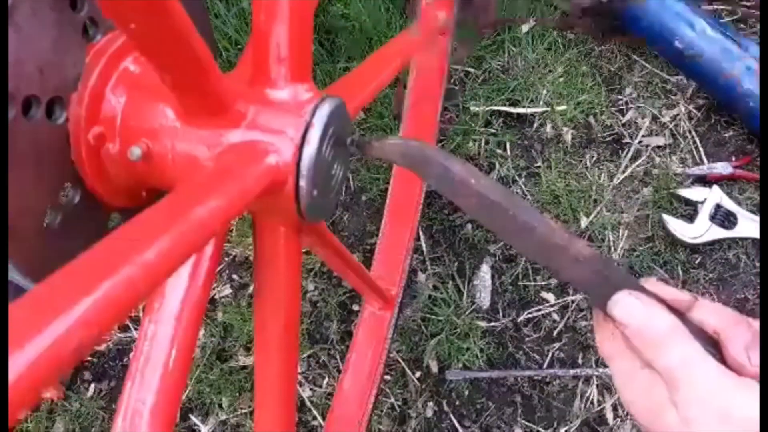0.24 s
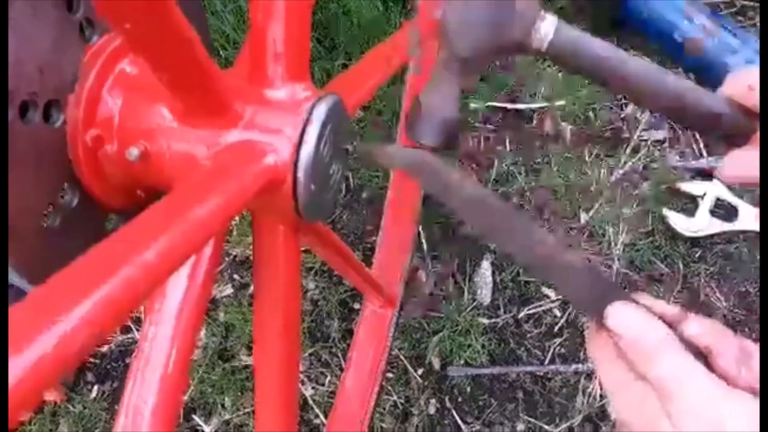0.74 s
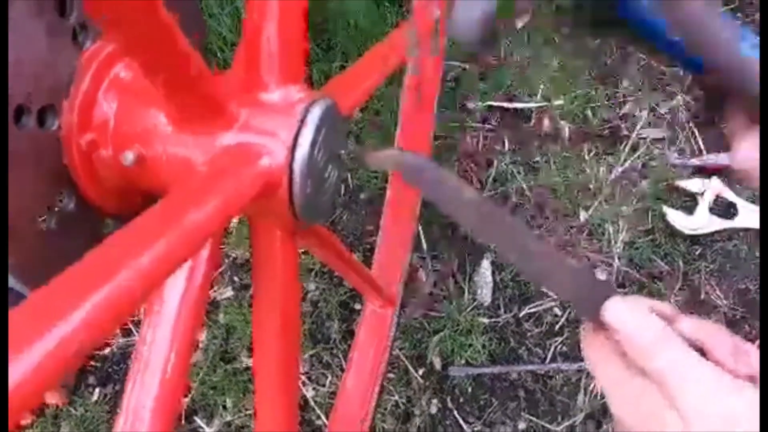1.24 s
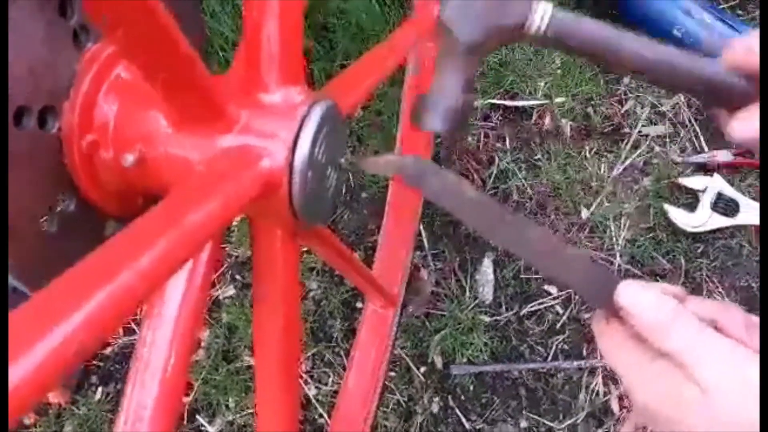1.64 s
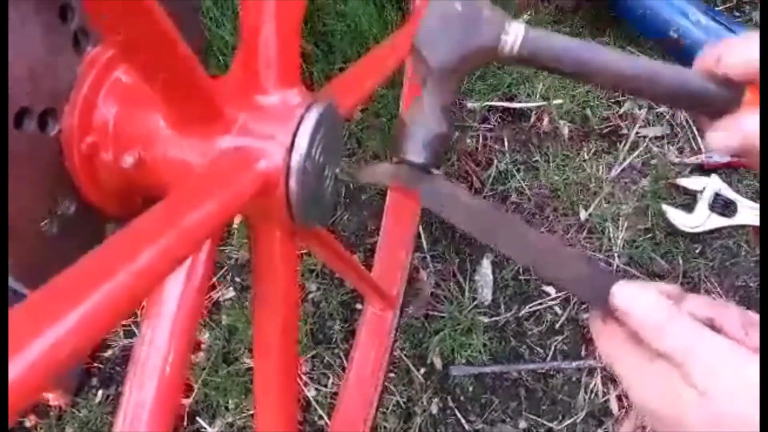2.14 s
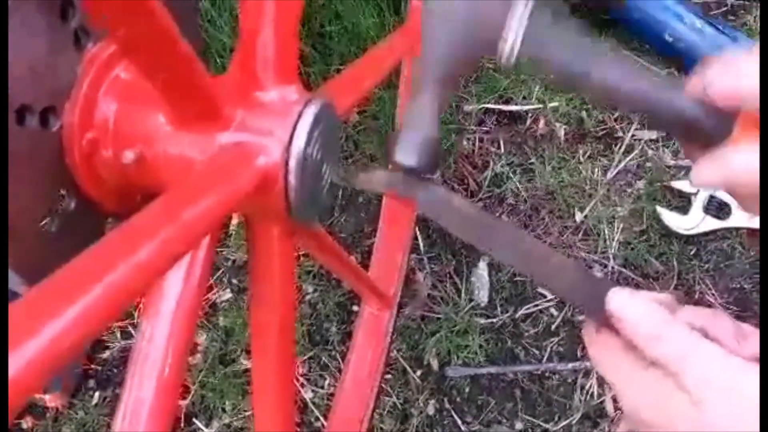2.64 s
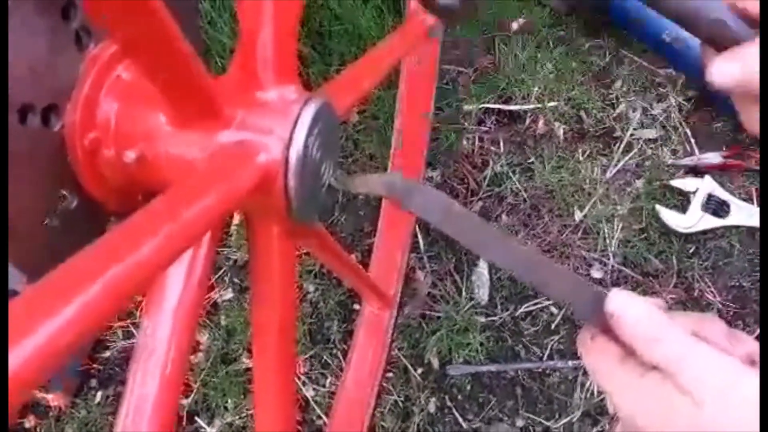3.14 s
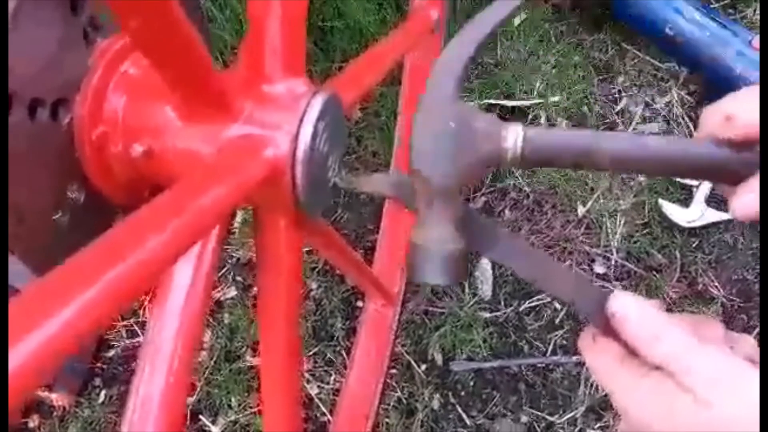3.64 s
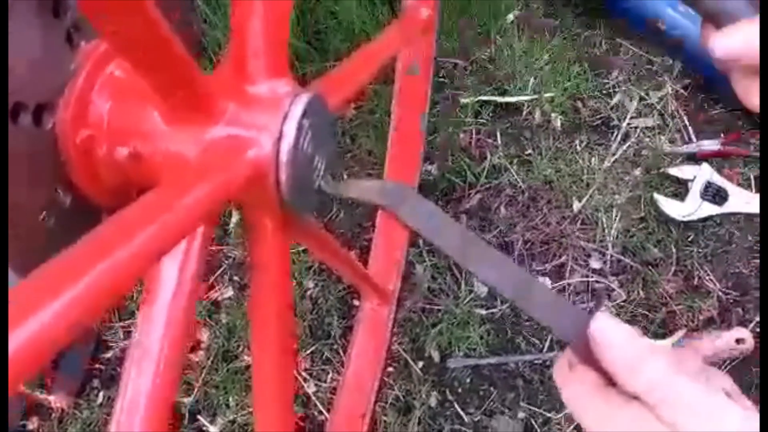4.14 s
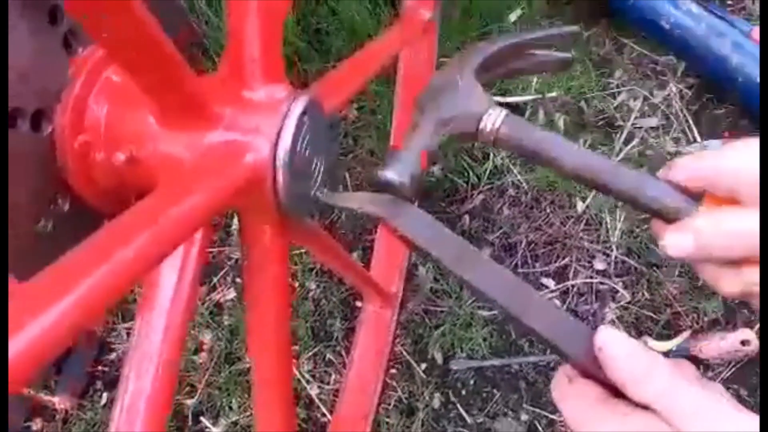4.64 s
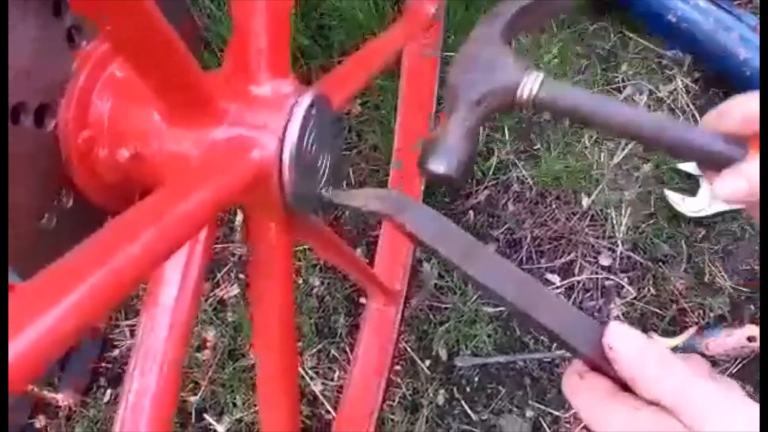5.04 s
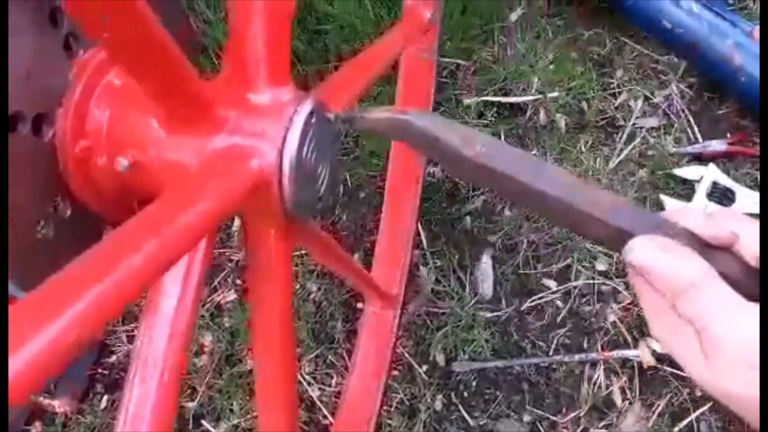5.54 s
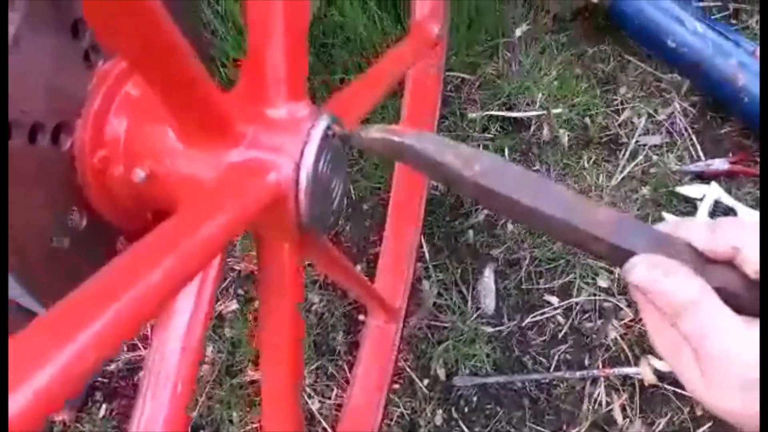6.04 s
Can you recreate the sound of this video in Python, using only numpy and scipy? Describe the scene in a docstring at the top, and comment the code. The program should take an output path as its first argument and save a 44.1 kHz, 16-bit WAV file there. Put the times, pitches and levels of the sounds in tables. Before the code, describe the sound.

A hammer repeatedly strikes a steel punch against a metal wheel cap, making short, sharp clangs, with wind gusts on the microphone.

```python
"""Outdoors in a yard, a hammer strikes a hand-held steel punch set on the hub cap of an iron wheel.
Each blow makes a short, dense clang as the metal rings, and a low thud through the ground.
Between blows the punch tip ticks and clinks on the cap. Gusts of wind buffet the left and right
microphone openings, over a faint hiss of far leaves and traffic."""
import sys
import numpy as np
from scipy import signal
from scipy.fft import rfft, irfft, next_fast_len
from scipy.io import wavfile
from scipy.ndimage import map_coordinates

SR = 44100
rng = np.random.default_rng(int(sys.argv[2]) if len(sys.argv) > 2 else 0)


def output_pcm(signal):
    """Save a mono or channel-first signal as 16-bit PCM at the path in sys.argv[1].

    Samples are clipped to [-1, 1] before scaling.
    """
    pcm = np.clip(np.atleast_2d(signal).T, -1, 1) * 32767
    wavfile.write(sys.argv[1], SR, np.round(pcm).astype(np.int16))


N = 276948

# the tones of the steel punch as it bends: (pitch [Hz], level [dB], base ring time [s])
PUNCH_TONES = [(2200, -5, 0.058), (4103, -2.5, 0.017), (4616, -5, 0.067), (6420, -9, 0.051),
               (8300, -15.5, 0.08), (9680, -6.5, 0.025), (11500, 5, 0.048)]


def amp(db):
    """Turn decibels into a factor to multiply by."""
    return 10 ** (np.asarray(db) / 20)


def unit(x):
    """Scale a sound to an average power of 1."""
    return x / np.sqrt(np.mean(x ** 2) + 1e-20)


def fade(t, ring_time):
    """A fade that falls by 60 dB in ring_time seconds."""
    return amp(-60 * t / ring_time)


def along(points, hz):
    """Read between (frequency, value) points, giving each octave equal room."""
    freqs, values = np.transpose(points)
    return np.interp(np.log(hz + 1), np.log(freqs + 1), values)


def wobble(rate, size):
    """A smooth random curve with a new value every 1 / rate steps."""
    return map_coordinates(rng.standard_normal(int(size * rate) + 4), [np.arange(size) * rate])


def filtered(x, gain):
    """Multiply each frequency in a sound by gain(hz)."""
    size = next_fast_len(x.shape[-1] + 8192)
    return irfft(rfft(x, size) * gain(np.fft.rfftfreq(size, 1 / SR)), size)[..., :x.shape[-1]]


def coloured(x, colour):
    """Shape a sound's bass and treble with (frequency [Hz], level [dB]) points."""
    return filtered(x, lambda hz: amp(along(colour, hz)))


def dying_noise(ring_times, stretch, size, channels):
    """Noise in which each frequency dies at its own speed; stretch multiplies the ring times."""
    hz, t, spectrum = signal.stft(rng.standard_normal((channels, size)), SR, nperseg=128)
    life = np.clip(stretch * along(ring_times, hz), .005, 3)[:, None]
    return signal.istft(spectrum * fade(t, life), SR, nperseg=128)[1][:, :size]


def ringing(tones, stretch, t, scatter_db):
    """Fading tones of struck metal; each stands for a cluster of close tones, so it wavers."""
    hz, db, ring_time = np.transpose(tones)[:, :, None]
    level_luck, phase_luck = rng.standard_normal((2, len(tones), 1))
    wander = 1.2 * np.array([wobble(4.7 / (life * SR), len(t)) for life in ring_time[:, 0]])
    waves = np.sin(2 * np.pi * hz * t + 3 * phase_luck + wander)
    return np.sum(amp(db + scatter_db * level_luck) * fade(t, stretch * ring_time) * waves, axis=0)


def place(out, sound, start, spread):
    """Add a sound with random phase shifts on each side, so it sounds wide and slightly smeared."""
    lead = 1024  # samples of room, as shifting phases smears the sound earlier too
    sound = np.pad(sound, ((0, 0), (lead, 0)))
    size = sound.shape[1]
    bins = size // 2 + 1
    phase = spread * np.array([wobble(45 / bins, bins), wobble(45 / bins, bins)])
    pair = irfft(rfft(sound) * np.exp(1j * phase), size)
    at = round(start * SR) - lead
    out[:, at:at + size] += pair[:, :N - at]


def hiss():
    """Far leaves and traffic, alike on the left and right only in the bass."""
    # colour of the hiss: (frequency [Hz], level [dB])
    colour = [(24, -51.5), (40, -5), (115, 1.5), (146, -2.5), (535, -9), (1460, -14), (2560, -11),
              (3190, -15), (3430, -15.5), (4170, -13), (8900, -25.5), (11900, -20), (13800, -35.5)]
    # how alike the two sides are: (frequency [Hz], likeness [0 to 1])
    likeness = [(60, .5), (200, 0.22), (700, 0.13), (13000, 0.024)]

    def split(hz):
        angle = np.arccos(along(likeness, hz)) / 2
        return amp(along(colour, hz)) * [np.cos(angle), np.sin(angle)]

    mid, side = filtered(rng.standard_normal((2, N)), split)
    level_db = -59.5 + wobble(4 / SR, N)
    return amp(level_db) * unit(np.array([mid + side, mid - side]))


def wind():
    """Swirls of air hit each microphone opening in lumps; the sharpest ones flutter higher up."""
    # strength of the wind: (time [s], level [dB])
    gusts = [(0.1, -57.5), (0.24, -28), (0.31, -28), (0.349, -44.5), (0.41, -34.5), (0.48, -38.5),
             (0.6, -49.5), (0.74, -67), (1.9, -75), (2.02, -50), (2.1, -64), (2.2, -33), (2.33, -25.5),
             (2.461, -43), (2.681, -45), (2.8, -51.5), (2.92, -77.5), (4.199, -81), (4.31, -37.5),
             (4.45, -56), (4.601, -76.5), (4.879, -67.5), (4.93, -45), (4.99, -61.5), (5.16, -25),
             (5.28, -28), (5.45, -33.5), (5.6, -49), (5.69, -45.5), (5.738, -40), (5.93, -33.5),
             (6.05, -27.5), (6.16, -18.5), (6.28, -30)]
    # colour of the low rumble: (frequency [Hz], level [dB])
    rumble_colour = [(12, -51.5), (20, -24), (56, -0.5), (143, -0.5), (306, -5), (526, -18), (576, -16),
                     (1500, -48), (1950, -73.5), (3300, -120)]
    # colour of the flutter: (frequency [Hz], level [dB])
    flutter_colour = [(59, -44.5), (100, -11), (151, -17), (304, -11), (422, 2), (474, -3), (1370, -24),
                      (5000, -68), (6500, -101), (11000, -120)]
    brisk_db, flutter_growth = -30, 1.3  # the flutter swells faster than the wind
    wind_db = np.interp(np.arange(N) / SR, *np.transpose(gusts))
    flutter_db = brisk_db - 4.5 + flutter_growth * (wind_db - brisk_db)
    swirls_db = 2.2 * (wobble(32 / SR, N) + np.array([wobble(40 / SR, N), wobble(40 / SR, N)]))
    spikes_db = 4 * np.array([wobble(140 / SR, N), wobble(140 / SR, N)])
    noise = rng.standard_normal((2, 2, N))
    rumble = unit(coloured(noise[0] * amp(swirls_db), rumble_colour))
    flutter = unit(coloured(noise[1] * amp(1.3 * swirls_db + spikes_db), flutter_colour))
    return amp(wind_db) * rumble + amp(flutter_db) * flutter


def puffs():
    """A strong swirl is two or three swings of air pressure, out of step on the two sides."""
    # the strongest swirls: (time [s], peak level [dB], pitch [Hz], left over right [dB])
    swirls = [(0.194, -22.5, 80, 0), (0.228, -21.5, 90, -3), (0.294, -17, 83.4, -3.5),
              (0.384, -21.5, 265, -3), (2.232, -19, 179, 2), (2.259, -14, 204, -3), (2.284, -18, 504, 3.5),
              (2.317, -18.5, 86.1, -2), (2.348, -19.5, 355, -6), (5.16, -14.5, 330, 2.5),
              (5.28, -13, 346, -3), (5.458, -19.5, 310, 4), (5.725, -26.5, 130, 4), (6.043, -15, 357, -4),
              (6.053, -7, 254, 1), (6.111, -5, 302, 2.5), (6.142, -4.5, 420, -5.5), (6.154, -5, 439, 18.5),
              (6.168, -25, 247, -2), (6.191, -9.5, 406, -0.5), (6.267, -13, 333, 2)]
    out, t = np.zeros((2, N + SR)), np.arange(SR // 20) / SR
    for start, db, hz, pan_db in swirls:
        age = t * hz / 0.8  # reaches 1 at the peak
        swell = (age * np.exp(1 - age)) ** 2
        swing = np.sin(2 * np.pi * hz * t + rng.uniform(0, 2 * np.pi, (2, 1)))
        sides = amp([[db + pan_db / 2], [db - pan_db / 2]])
        at = round(start * SR)
        out[:, at:at + len(t)] += sides * swell * swing
    return out[:, :N]


def yard_echo(x):
    """The ground and things nearby send back a blurred echo."""
    # how long the echo lasts: (frequency [Hz], base ring time [s])
    ring_times = [(300, 0.99), (1500, .4), (5000, 0.2), (12000, 0.067)]
    tail = dying_noise(ring_times, stretch=0.85, size=SR // 2, channels=2)
    return signal.fftconvolve(x, tail / np.linalg.norm(tail[0]), axes=1)[:, :N]


def punch_ticks():
    """The tip scrapes or bounces on the cap: a small scratch, and a ring cut short by the hand."""
    # light touches: (time [s], level [dB], body boost [dB], treble boost [dB])
    touches = [(0.1363, -15, -7, -13.5), (0.1517, -21, 4, -23.5), (0.3186, -42.5, 7, -28.5),
               (0.3646, -25.5, -3.5, -21), (0.6412, -42.5, 9.5, -19), (0.7848, -20.5, -11.5, -15.5),
               (1.3323, -25, -1.5, -17), (2.6657, -47.5, 6, 4.5), (3.2256, -26.5, 5.5, -9),
               (3.744, -38, -7, -18.5), (3.8385, -29, 3, -13.5), (4.1139, -32.5, 0, -14.5),
               (4.1294, -37, -4, -9), (4.1622, -43.5, -16, -15), (4.2505, -29, -6.5, -12.5),
               (4.2807, -48, 2, -6), (4.5156, -39, 8, -11.5), (4.6299, -38.5, -0.5, -7.5),
               (4.935, -47.5, 9, -19.5), (4.9551, -42.5, -3, -4.5), (5.033, -47, 7.5, -16.5),
               (5.1224, -42.5, 10.5, -24), (5.5079, -47, 9, -18), (5.7136, -36, 6.5, -14.5),
               (5.8145, -41.5, -3, -22.5), (5.8324, -43.5, 10, 1), (5.8499, -25, 0, -7.5),
               (5.9733, -41.5, -3, -7.5)]
    out, t = np.zeros((2, N)), np.arange(SR // 4) / SR
    for start, db, body_db, treble_db in touches:
        colour = [(300, body_db - 10.5), (1800, body_db), (3000, 0), (7000, 0), (9000, treble_db)]
        scratch = rng.standard_normal(len(t)) * fade(t, 0.053)
        ring = amp(-8) * ringing(PUNCH_TONES, 0.5, t, scatter_db=5)
        place(out, amp(db) * coloured(scratch + ring, colour)[None], start, spread=2.2)
    return out


def punch_clinks():
    """The loosely held punch knocks the cap and rings freely."""
    # loose knocks: (time [s], level [dB])
    knocks = [(5.3318, -35), (5.672, -33)]
    # colour of a clink: (frequency [Hz], level [dB])
    colour = [(600, -6.5), (2200, 5), (4400, 0.5), (8500, -7.5), (9300, -22.5)]
    out, t = np.zeros((2, N)), np.arange(SR // 4) / SR
    for start, db in knocks:
        ring = ringing(PUNCH_TONES, 1.0, t, scatter_db=4.5)
        scratch = 0.73 * rng.standard_normal(len(t)) * fade(t, 0.04)
        place(out, amp(db) * coloured(ring + scratch, colour)[None], start, spread=2.2)
    return out


def ground_thud(t):
    """A blow thumps through the ground; its pitch sags as it spreads."""
    cycles = 60 * t + 1.1 * (1 - np.exp(-t / 0.0039))
    return np.sin(2 * np.pi * cycles) * fade(t, 0.11)


def hub_knock(t):
    """The hub takes the blow with a very short, dull knock."""
    burst = rng.standard_normal(len(t)) * fade(t, 0.0043)
    return unit(filtered(burst, lambda hz: (hz / 450) ** 2 / (1 + (hz / 600) ** 4)))


def spoke_ring(t):
    """The spokes and rim ring with a few low tones."""
    # their tones: (pitch [Hz], level [dB], base ring time [s])
    tones = [(307, 3.5, 0.27), (531, -0.5, .4), (630, -1, 0.39), (747, -7.5, 0.19)]
    return ringing(tones, 0.92, t, scatter_db=2.5)


def cap_rattle(t):
    """The loose cap shivers on after a blow, with the crowd of tones of a thin plate."""
    # colour of the rattle: (frequency [Hz], level [dB])
    colour = [(410, -30), (700, -4.5), (1200, -5.5), (1440, -0.5), (1810, -4), (4280, 1.5), (8820, -15),
              (11500, -14), (13000, -16.5), (13800, -42.5)]
    count, size = 100, SR // 4
    chatter = amp(3 * wobble(120 / SR, len(t))) * fade(t, 0.18) * (1 - np.exp(-t / 0.015))
    tones = np.transpose([rng.uniform(900, 13000, count), rng.normal(0, 3, count), np.full(count, .3)])
    shiver = 1.4 * rng.standard_normal((2, size)) + unit(ringing(tones, 1.0, t[:size], scatter_db=1))
    shiver = np.pad(shiver, ((0, 0), (0, len(t) - size)))
    return unit(coloured(shiver * chatter, colour))


def steel_clang(t, broad_db, treble_db, stretch, bite_hz):
    """Cap and hub crack and ring; where the tip sits picks the pitch driven hardest, the bite."""
    # clear tones of the cap and hub: (pitch [Hz], level [dB], base ring time [s])
    tones = [(1418, 0.5, 0.11), (2545, -9.5, 0.1), (2910, -13, 0.041), (3226, -13.5, 0.15),
             (3980, -8.5, 0.059), (4280, -1, 0.067), (4470, -4.5, 0.11), (4980, -9, 0.07),
             (5840, -11, 0.048), (6370, -8.5, 0.074), (6820, -16, 0.033), (7260, -8, 0.085),
             (8170, 0.5, 0.082), (9260, -19.5, .07), (9860, -19, .08), (11500, -16.5, 0.069),
             (11700, -9, .05), (12130, -11, 0.056)]
    # colour of the dense, noisy part: (frequency [Hz], level [dB])
    dense_colour = [(120, -32.5), (200, -19), (1160, -8.5), (1410, -4.5), (2040, -8), (3180, -8.5),
                    (3600, -11.5), (4140, -2.5), (5800, -13), (6450, -3.5), (10100, -13.5), (12200, 0),
                    (13800, -36)]
    # how long the dense part lasts: (frequency [Hz], base ring time [s])
    ring_times = [(250, 0.59), (600, 0.31), (1200, 0.057), (3000, 0.074), (4400, 0.07), (7000, 0.095),
                  (12000, 0.059)]
    # the broad clang on either side of the bite: (frequency [Hz], level [dB])
    broad_colour = [(1000, -5), (3000, 0.5), (5800, -0.5), (8500, -8.5), (9500, -2.5)]
    shared, left, right = dying_noise(ring_times, stretch, size=len(t), channels=3)
    crack = rng.standard_normal(len(t)) * fade(t, 0.0059)
    dense = coloured(shared + 0.86 * np.array([left, right]) + crack, dense_colour)
    steel = unit(dense) + amp(5) * ringing(tones, stretch, t, scatter_db=4)
    broad = [(hz, db + broad_db + treble_db * (hz > 9000)) for hz, db in broad_colour]
    colour = sorted(broad + [(3000, 0), (5300, 0)])  # the range around the bite is always driven in full
    bite = lambda hz: 1 + 0.55 / (1 + ((hz - bite_hz) / 450) ** 2)
    attack = 1 - np.exp(-t / 0.00021)
    return unit(filtered(steel, lambda hz: amp(along(colour, hz)) * bite(hz)) * attack)


def hammer():
    """Each blow on the punch rings the wheel, shakes the cap, knocks the hub and thuds in the ground."""
    # the blows: (time [s], strength [dB], thud [dB], hub knock [dB], broad clang boost [dB],
    # extra treble [dB], ring time stretch [factor], bite pitch [Hz])
    blows = [(0.0814, -9.5, -45, -42.5, -7, -3, 0.79, 4220), (0.4913, -11, -23.5, -42, 0, -3, 0.78, 4220),
             (0.7633, -11, -23.5, -45, 0.5, -1, 0.92, 4310),
             (1.0355, -12, -23, -43.5, 0.5, 0.5, 0.72, 4300),
             (1.3009, -11, -30, -39, -0.5, -2.5, 0.69, 3990), (1.571, -11, -27.5, -43, 1.5, 1, 0.74, 4470),
             (1.8349, -10.5, -21, -39.5, -2.5, -1, 0.74, 4010),
             (2.1147, -11, -20, -35.5, -4.5, 1.5, 0.82, 4220), (2.412, -10.5, -27, -37, 1, 1, 0.87, 4520),
             (2.6928, -12, -19, -45, -5, 8, 1.13, 4420), (2.9802, -10, -32.5, -43.5, -2, 2, 0.91, 4280),
             (3.3097, -9, -43, -44, -5.5, -3, 0.8, 4800), (3.705, -9.5, -23.5, -39, -3, -1.5, 1.01, 4300),
             (4.0429, -11.5, -20.5, -41, 0, 1, 1.1, 3970), (4.3595, -10, -24.5, -39.5, 1.5, 0, 1.01, 3990),
             (4.666, -10, -22, -48, -1, -0.5, 0.88, 4505), (6.2411, -8.5, -22, -39.5, 2.5, -2, 0.92, 4250)]
    out, t = np.zeros((2, N)), np.arange(SR // 2) / SR
    for start, db, thud_db, knock_db, broad_db, treble_db, stretch, bite_hz in blows:
        clang = amp(db - 19) * steel_clang(t, broad_db, treble_db, stretch, bite_hz)
        knock = amp(knock_db) * hub_knock(t)
        rattle = amp(db - 31.5) * cap_rattle(t)
        spokes = amp(db - 28.5) * spoke_ring(t)
        place(out, clang + knock + rattle + spokes, start, spread=1.84)
        place(out, amp(thud_db) * ground_thud(t)[None], start, spread=0.34)
    return out


def scene():
    """The work on the wheel and its weak echo, with wind and hiss."""
    work = hammer() + punch_ticks() + punch_clinks()
    return work + amp(-26.5) * yard_echo(work) + wind() + puffs() + hiss()


def record(dry):
    """Round off the loudest peaks and cut the highest treble."""
    ceiling, top_hz = 0.9, 13980
    soft = dry / (1 + np.abs(dry / ceiling) ** 6) ** (1 / 6)
    return filtered(soft, lambda hz: hz < top_hz)


dry = scene()
out = record(dry)
output_pcm(out)
```